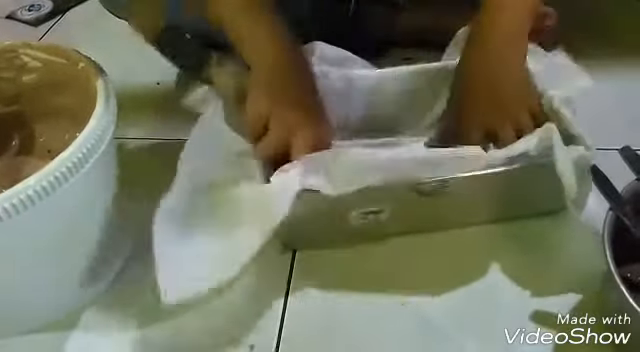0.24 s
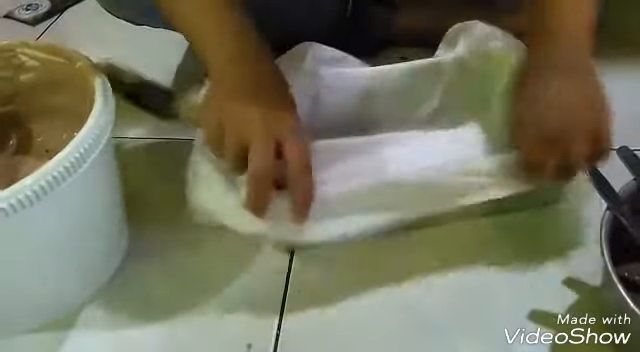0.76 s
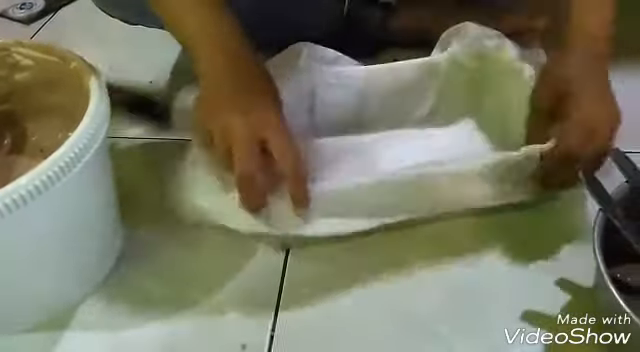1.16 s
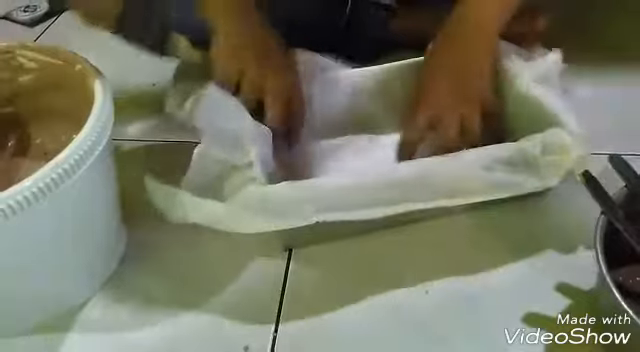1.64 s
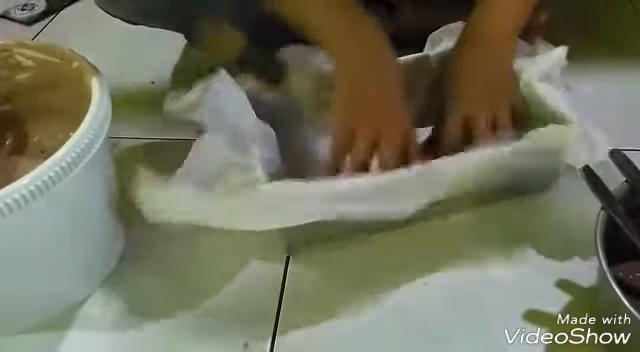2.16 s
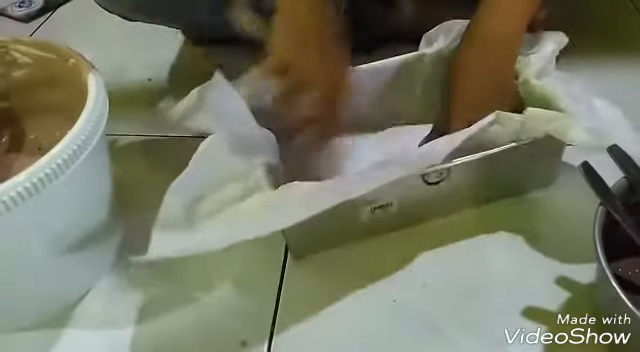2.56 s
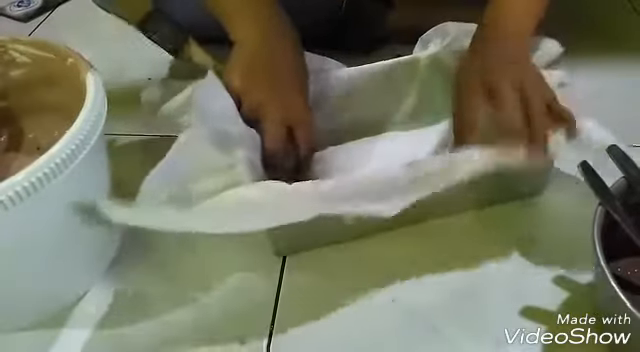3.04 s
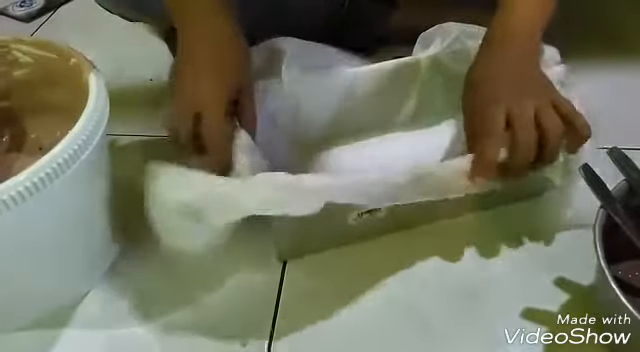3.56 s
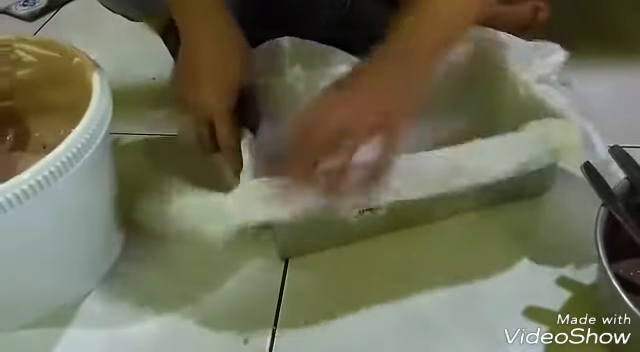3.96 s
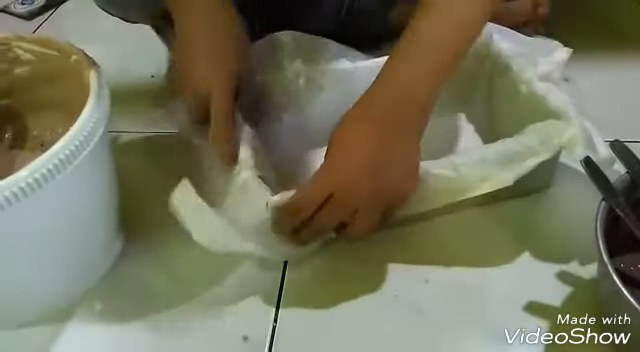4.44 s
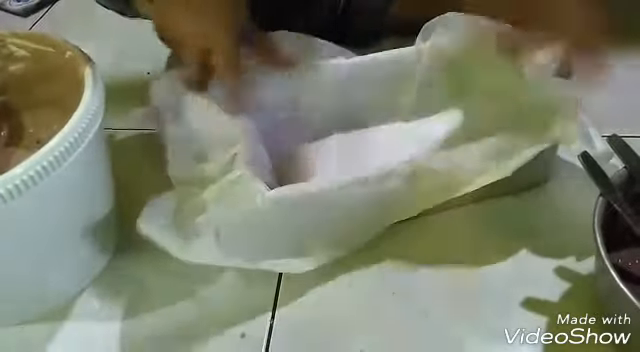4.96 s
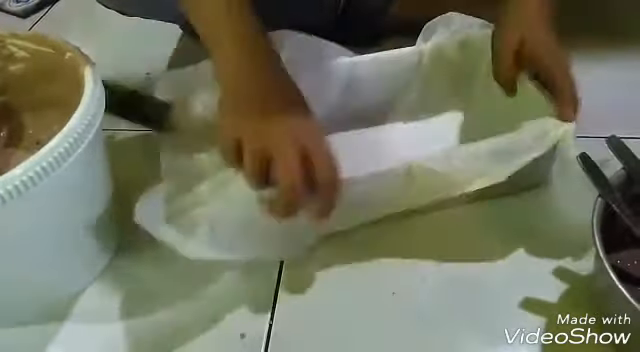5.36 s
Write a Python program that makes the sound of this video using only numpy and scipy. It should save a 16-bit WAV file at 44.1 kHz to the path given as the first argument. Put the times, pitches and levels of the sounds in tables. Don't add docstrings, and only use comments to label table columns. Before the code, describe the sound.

Very close, dry crinkling of stiff baking paper as hands work it into a thin metal tin. Uneven rustling swells and sharp snaps come throughout, with one huge crunch near one and a half seconds. Faint dull tin thumps sit underneath. Small tiled room, close phone microphone, the loudest snap clipping.

```python
import sys
import numpy as np
from scipy import signal
from scipy.fft import rfft, irfft, next_fast_len
from scipy.io import wavfile
from scipy.ndimage import uniform_filter1d, map_coordinates

SR = 44100
rng = np.random.default_rng(int(sys.argv[2]) if len(sys.argv) > 2 else 0)


def how_loud(loudness_db):
    steps = np.asarray(loudness_db, float) / 20
    return 10 ** steps


def transcribe(u):
    v = np.clip(np.atleast_2d(u).T, -1, 1)
    q = np.round(v * 32767).astype(np.int16)
    wavfile.write(sys.argv[1], SR, q)


N = 247401


def unit(x):
    return x / np.sqrt(np.mean(x ** 2) + 1e-20)


def along(points, hz):
    f, v = np.transpose(points)
    return np.interp(np.log(hz + 1), np.log(f + 1), v)


def curves(rows):
    s, *cols = np.transpose(rows)
    return [np.interp(np.arange(N) / SR, s, c) for c in cols]


def wobble(rate):
    knots = rng.standard_normal(int(N * rate / SR) + 4)
    return map_coordinates(knots, [np.arange(N) * rate / SR])


def filtered(x, response):
    m = next_fast_len(N + SR // 2)
    return irfft(rfft(x, m) * response(np.fft.rfftfreq(m, 1 / SR)), m)[..., :N]


def sides(pan_db):
    return how_loud(np.array([pan_db / 2, -pan_db / 2]))


def ports(pair, gain):
    # frequency in Hz, left minus right in dB
    balance = [(100, -1), (380, 3), (1300, 1), (2500, 2), (4300, -1.5), (7000, 2.5), (9000, 3), (10000, 14),
               (11200, 15), (14000, 15.5)]
    # frequency in Hz, left-right likeness (-1 opposite, 0 unrelated, 1 same)
    alike = [(60, -0.76), (500, -0.73), (1400, -0.4), (3000, -0.046), (6000, 0.071)]

    def turn(hz):
        return np.arccos(np.clip(along(alike, hz), -1, 1)) / 2

    mid, side = filtered(pair, lambda hz: gain(hz) * [np.cos(turn(hz)), np.sin(turn(hz))])
    return filtered(np.array([mid + side, mid - side]), lambda hz: sides(along(balance, hz)))


def paper():
    crisp_db = handling()
    effort_db = crisp_db + 29.5
    body_db = -37 + 0.95 * effort_db
    boom_db = -51 + 0.62 * effort_db
    grain = buckles(rate=450, spread_db=4, cap_db=8, clump_db=5, t60=.012, smooth=.6)
    grain = grain * sides(1.5 * wobble(8))
    snap_crisp, snap_body = snaps()
    crisp = how_loud(crisp_db) * grain * sheet(lo_hz=4050, hi_hz=19700, patchy_db=3.0)
    crisp += snap_crisp * even(sheet(lo_hz=4330, hi_hz=20700, patchy_db=8.0))
    body = np.hypot(how_loud(body_db) * grain ** 0.5, snap_body) * sheet(lo_hz=677, hi_hz=3860, patchy_db=2.5)
    boom = how_loud(boom_db + 2.4 * wobble(25)) * sheet(lo_hz=100, hi_hz=632, patchy_db=0)
    return crisp + body + boom


def handling():
    # start in seconds, hold in seconds, rustle in dB, fall in ms per 10 dB
    presses = [(0.135, .03, -28.5, 48), (1.47, 0.018, -6, 18.5), (1.515, 0.027, -23.5, 66),
               (1.605, 0.17, -19.5, 40), (2.106, 0.048, -30, 40), (2.227, 0.066, -21, 55),
               (2.264, 0.12, -18.5, 57), (2.43, 0.044, -30.5, 46), (2.729, .02, -26.5, 19),
               (3.301, 0.027, -33.5, 36.5), (3.99, 0.15, -23.5, 36), (3.438, 0.062, -38.5, 60),
               (4.206, 0.066, -22.5, 56.5), (4.533, 0.047, -31, 59.5), (5.329, .04, -50.5, 69),
               (5.436, 0.067, -30, 13.5), (5.535, 0.056, -35.5, 62)]
    # crest in seconds, rustle in dB, rise and fall in ms per 10 dB
    sweeps = [(0, -39.5, 50, 70), (.214, -11.5, 51.3, 57), (.378, -25.5, 100, 135), (.59, -33, 69.3, 560),
              (.706, -23, 30, 52), (.859, -11, 47, 129), (1.068, -23.5, 59, 58), (1.293, -25, 86, 49),
              (1.93, -25.5, 64, 18), (2.164, -20.5, 51, 29), (2.421, -23, 100, 10), (2.65, -51.5, 151, 130),
              (2.762, -14.5, 27.8, 21), (2.841, -14.5, 50, 39), (2.932, -23, 25, 99),
              (3.108, -30, 59.7, 36), (3.225, -26, 60, 87), (3.346, -21, 69, 68), (3.56, -34.5, 150, 100),
              (3.649, -19.5, 70, 41), (3.72, -26.5, 50.8, 110), (3.93, -38.5, 200, 20),
              (4.289, -18.5, 60, 113), (4.668, -26.5, 55, 27), (4.785, -31, 100, 66),
              (4.96, -47.5, 100, 216), (5.085, -31, 41, 22), (5.407, -27, 30, 20), (5.478, -21.5, 30, 36),
              (1.97, -48.5, 30, 93)]
    land_ms, rest_db = 5.8, -68.5
    ms = np.arange(N) * 1000 / SR
    landings = np.array([-1] + [s for s, *_ in presses]) * 1000
    moves = [(s, hold, db, land_ms, fall) for s, hold, db, fall in presses]
    moves += [(s, 0, *rest) for s, *rest in sweeps]
    power = how_loud(2 * rest_db)
    for s, hold, db, rise, fall in moves:
        early = (1000 * s - ms) / rise
        late = (ms - 1000 * (s + hold)) / fall
        unborn = (landings[landings <= 1000 * s].max() - ms) / land_ms
        slope = np.maximum(0, np.max([early, late, unborn], axis=0))
        power = power + how_loud(2 * db - 20 * slope)
    return 10 * np.log10(power)


def buckles(rate, spread_db, cap_db, clump_db, t60, smooth):
    chance, size = rng.random(N), rng.exponential(size=N)
    struck = chance < rate / SR * how_loud(clump_db * wobble(30))
    starts = struck * how_loud(np.minimum(spread_db * size, cap_db))
    t = np.arange(SR // 20) / SR
    bursts = signal.fftconvolve(starts ** 2, how_loud(-120 * t / t60))[:N]
    return unit(np.sqrt(np.abs(bursts) / np.mean(bursts) + smooth))


def creases():
    # time in seconds, peak in dB
    flecks = [(.428, -27), (.487, -28), (.5273, -30), (.6011, -30.5), (.6241, -29), (.813, -20), (.849, -9),
              (.857, -7.5), (.868, -7), (.876, -11), (.904, -14), (.929, -13), (1.1, -20.5), (1.1718, -22),
              (1.39, -36.5), (1.7016, -15), (1.7271, -14), (1.759, -15.5), (2.5667, -35.5), (3.0895, -26),
              (3.2536, -23), (3.915, -32), (4.175, -26), (4.3367, -11.5), (4.4147, -14), (4.6839, -23.5),
              (4.885, -35), (5.4192, -15), (5.5914, -16.5)]
    # time in seconds, peak in dB
    ticks = [(.3402, -10), (.379, -10.5), (.4122, -7.5), (.4495, -10), (.8236, -0.5), (1.7382, -12.5),
             (1.773, -8), (1.7843, -5), (1.7949, -5), (2.0419, -29.5), (2.1072, -15), (2.627, -29),
             (3.1829, -11), (3.1964, -12.5), (3.3132, -6.5), (3.5122, -14.5), (3.5977, -10),
             (4.0066, -12.5), (4.0633, -9.5), (4.117, -6.5), (4.189, -14), (4.3315, -5.5), (4.4324, -7),
             (4.4895, -14.5), (4.526, -12), (4.7782, -12), (4.8369, -11), (5.4107, -9.5), (5.5702, -30),
             (5.5865, -11.5)]
    # time in seconds, peak in dB
    cracks = [(.128, -34), (.1576, -15), (.2534, -22), (.6968, -19), (1.124, -15), (1.163, -14),
              (1.2358, -12.5), (1.3451, -11), (1.596, -5.5), (1.7112, -7), (1.747, -7), (2.12, -1.5),
              (2.722, -24), (2.866, -1.5), (3.0144, -13.5), (3.0326, -16), (3.241, -23), (3.521, -20.5),
              (3.559, -14.5), (3.6136, -22.5), (3.719, -16.5), (3.9954, -14.5), (4.0832, -7), (4.1212, -7),
              (4.215, -16.5), (4.3091, -4.5), (4.405, -10), (4.6123, -17.5), (4.7372, -21.5),
              (5.0164, -20.5)]
    # time in seconds, peak in dB
    pops = [(.334, -15.5), (.639, -21.5), (.7243, -20), (1.4108, -34.5), (2.9343, -31.5), (3.166, -24.5),
            (3.321, -25.5), (3.7106, -19), (3.788, -21.5), (3.8953, -27), (3.9267, -28), (4.3256, -16),
            (4.369, -23.5), (4.419, -19), (4.5686, -28), (4.658, -22.5), (4.8028, -24), (4.851, -25),
            (4.8689, -35.5), (5.1467, -28.5), (5.375, -35.5), (5.4127, -18.5), (5.441, -22.5),
            (5.505, -22.5), (5.548, -26.5)]
    # time in seconds, peak in dB, width in ms
    crunches = [(.2599, -15.5, 12), (0.911, -9, 8.1), (.957, -13.5, 35), (1.024, -13.5, 7.9),
                (1.0585, -11, 37), (1.1314, -13.5, 7.8), (1.4652, 1.5, 9.5), (1.6203, -11, 16),
                (1.637, -11, 8), (2.2166, -20.5, 8.3), (2.405, -16.5, 9.8), (2.4737, -24.5, 6.3),
                (2.7675, -13, 4.3), (2.839, -2, 3.7), (3.2102, -21, 7.7), (3.541, -20, 12),
                (3.6243, -15.5, 27), (3.652, -15, 4.6), (3.87, -24.5, 7.7), (4.268, -13.5, 8),
                (4.2987, -23, 4.4), (4.364, -17, 5), (4.646, -23, 12), (5.4, -18, 5), (0.7854, -16, 5),
                (2.32, -14.5, 4), (3.308, -16.5, 3), (4.045, -17.5, 3), (4.0536, -18.5, 3),
                (4.7577, -22, 4)]
    # time in seconds, peak in dB, body relative in dB, width in ms
    nail = [
        (2.638, -51.5, 12, 3),
    ]
    # table, body relative dB, width ms
    kinds = [(flecks, -19, 2.2), (ticks, -18.5, 1.77), (cracks, -21.5, 3.23), (pops, -9, 3.4)]
    plain = [(s, db, body_db, width) for rows, body_db, width in kinds for s, db in rows]
    crushed = [(s, db, -14, width) for s, db, width in crunches]
    return plain + crushed + list(nail)


def snaps():
    crisp, body = np.zeros((2, N + SR)), np.zeros((2, N + SR))
    lead = 200
    ms = np.arange(-lead, 1200) * 1000 / SR
    events = creases()
    lean_db = rng.standard_normal(len(events))
    for (s, db, body_db, width), lean in zip(events, lean_db):
        at = round(s * SR) - lead
        reach_ms = np.where(ms < 0, .4, .5) * width + .05
        shape_db = -6 * (np.abs(ms) / reach_ms) ** 1.4
        crisp[:, at:at + len(ms)] += (how_loud(db - 2.0 + shape_db) * sides(3 * lean)[:, None]) ** 2
        body[:, at:at + len(ms)] += how_loud(db + body_db + 1.5 + .5 * shape_db) ** 2
    return np.sqrt(crisp[:, :N]), np.sqrt(body[:, :N])


def sheet(lo_hz, hi_hz, patchy_db):
    # frequency in Hz, level in dB per Hz
    colour = [(59, -20), (100, -17), (179, -24.5), (301, -15), (505, -18), (765, -14), (1550, -14),
              (2660, -11), (2950, -9), (4030, -10.5), (5060, -4), (6770, -3), (9640, -1.5), (11400, -0.5),
              (14300, -10.5)]
    z = signal.stft(rng.standard_normal((2, N)), nperseg=128)[2]
    field = uniform_filter1d(rng.standard_normal(z.shape), size=2, axis=1)
    field = uniform_filter1d(field, size=3, axis=2)
    field = unit(field) + unit(uniform_filter1d(field, size=24, axis=2))
    pair = signal.istft(z * how_loud(patchy_db * unit(field)), nperseg=128)[1][:, :N]

    def band(hz):
        return how_loud(along(colour, hz)) / np.sqrt((1 + (lo_hz / (hz + 1)) ** 6) * (1 + (hz / hi_hz) ** 6))

    return unit(ports(pair, band))


def even(x):
    level = np.sqrt(np.abs(uniform_filter1d(x ** 2, size=44, axis=1))) + 1e-9
    return x / level * np.sqrt(np.mean(x ** 2, axis=1, keepdims=True))


def tin():
    # time in seconds, peak in dB, t60 in seconds
    thumps = [(0.134, -34, 0.086), (0.446, -39.5, 0.21), (0.711, -35.5, 0.064), (1.324, -38.5, 0.051),
              (1.35, -40, 0.064), (1.366, -40, 0.087), (1.381, -33.5, 0.04), (1.458, -22.5, 0.029),
              (1.6, -29, 0.081), (1.769, -35.5, 0.11), (2.12, -32.5, 0.055), (2.279, -42, 0.088),
              (2.635, -56, 0.061), (2.643, -52, 0.052), (2.859, -54, 0.07), (3.626, -46.5, 0.034),
              (4.012, -36.5, 0.07), (4.657, -57.5, 0.086), (5.034, -47.5, 0.15), (5.459, -45.5, 0.092)]
    # centre in Hz, width in Hz, level in dB
    resonances = [(80, 70, -17), (143, 37, 2.5), (285.6, 62, 3), (392, 38, 4.5), (684, 27, 3),
                  (744, 43, -4.5), (1010, 230, 0)]
    push, t = np.zeros((2, N + SR)), np.arange(SR // 8) / SR
    for s, db, t60 in thumps:
        burst = how_loud(db + 19.5 - 60 * t / t60) * rng.standard_normal((2, len(t)))
        push[:, round(s * SR):][:, :len(t)] += burst

    def modes(f):
        total = 0
        for k, (c, w, db) in enumerate(resonances):
            total = total + (-1) ** k * how_loud(db) * 1j * f * w / (c * c - f * f + 1j * f * w)
        return total

    return ports(push[:, :N], modes)


def squeak():
    # time in seconds, pitch in Hz, level in dB
    slides = [
        [(1.34, 720, -49), (1.4, 660, -55)],
        [(1.99, 2220, -59.5), (2.04, 2450, -50.5), (2.12, 2390, -50)],
        [(2.65, 2740, -50), (2.75, 2600, -52)],
    ]
    out, t = np.zeros(N), np.arange(N) / SR
    for rows in slides:
        hz, db = curves(rows)
        fade = np.clip(np.minimum(t - rows[0][0], rows[-1][0] - t) / 0.0154, 0, 1)
        level = fade * how_loud(db - 1 + 2.5 * wobble(150))
        shaky_hz = hz * (1 + .025 * wobble(300))
        out += level * np.sin(2 * np.pi * np.cumsum(shaky_hz) / SR)
    return out * sides(6.)[:, None]


def kitchen(x):
    # frequency in Hz, t60 in seconds
    decay = [(300, 0.36), (2000, 0.33), (10000, 0.069)]
    hz, t, z = signal.stft(rng.standard_normal((1, SR // 2)), SR, nperseg=256)
    tail = signal.istft(z * how_loud(-60 * t / along(decay, hz)[:, None]), SR, nperseg=256)[1]
    return signal.fftconvolve(x, tail / np.linalg.norm(tail), axes=1)[:, :N]


def air():
    # frequency in Hz, level in dB per Hz
    hush = [(18, -28), (30, -11), (59, -3.5), (178, -14), (197, -37), (554, -49), (598, -21), (663, -45),
            (3840, -60), (9960, -33.5), (14300, -67)]
    level = how_loud(-58 + 1.5 * wobble(7.5))
    return level * unit(ports(rng.standard_normal((2, N)), lambda hz: how_loud(along(hush, hz))))


def scene():
    near = paper() + tin() + squeak()
    return near + how_loud(-16) * kitchen(near) + air()


def starved(x, soft_db, fickle_db):
    # frequency in Hz, threshold
    # in dB
    mask = [(80, -5), (300, -7), (560, -3.5), (850, -10), (2300, -8), (2800, -6), (4200, -3), (6000, -10),
            (13500, -11)]
    gaps = [
        (1.45, 1.457),
        (2.08, 2.087),
        (3.175, 3.179),
        (4.52, 4.523),
    ]
    hz, _, z = signal.stft(x, SR, nperseg=2048, noverlap=1536)
    power = np.abs(z[:, :1024]) ** 2
    bands = 10 * np.log10(power.reshape(2, 256, 4, -1).mean(2) + 1e-14)
    loudest = uniform_filter1d(bands[:, 16:], size=24, axis=1).max(axis=(0, 1))
    share = uniform_filter1d(bands - loudest, size=3, axis=1)
    whim = uniform_filter1d(rng.standard_normal((128, len(loudest))), size=6, axis=1)
    whim = unit(whim).repeat(2, axis=0)
    margin = share - np.median(share, axis=2, keepdims=True)
    margin = margin - along(mask, hz[2:1024:4])[:, None] + fickle_db * whim
    margin += .15 * np.minimum(loudest - np.median(loudest), 0)
    opening = 1 / (1 + np.exp(np.clip(-margin / soft_db, -30, 30)))
    z[:, :1024] *= opening.repeat(4, axis=1)
    y = signal.istft(z, SR, nperseg=2048, noverlap=1536)[1][:, :N]
    for start, end in gaps:
        y[:, round(start * SR):round(end * SR)] *= .07
    return y


def band_limit(x):
    return signal.sosfilt(signal.butter(12, 15280, fs=SR, output="sos"), x)


def record(dry):
    x = starved(np.clip(dry, -1.15, 1.15), soft_db=.4, fickle_db=5)
    x = filtered(x, lambda hz: 1 / np.sqrt(1 + (hz / 14100) ** 200))
    return band_limit(np.clip(x, -1, 1))


dry = scene()
out = record(dry)
transcribe(out)
```